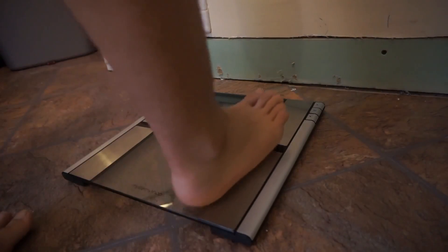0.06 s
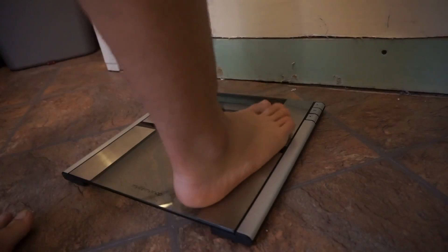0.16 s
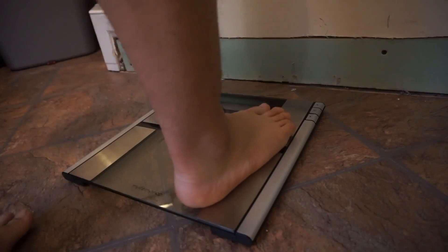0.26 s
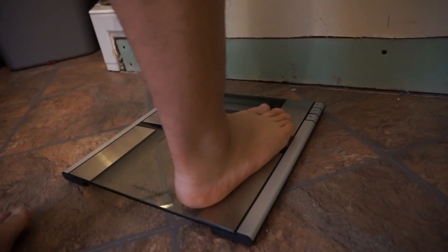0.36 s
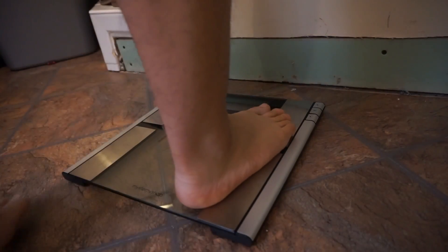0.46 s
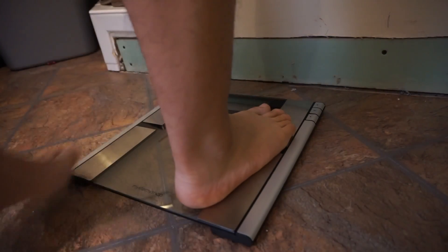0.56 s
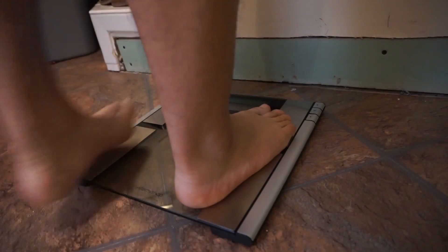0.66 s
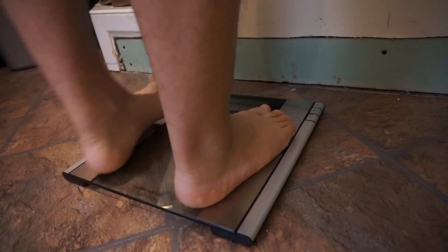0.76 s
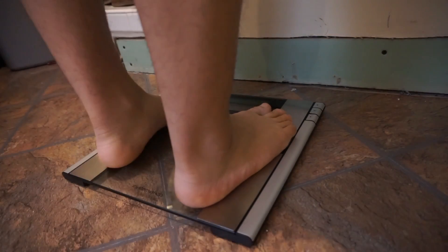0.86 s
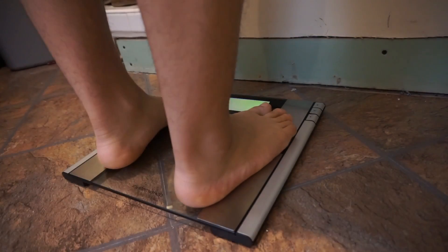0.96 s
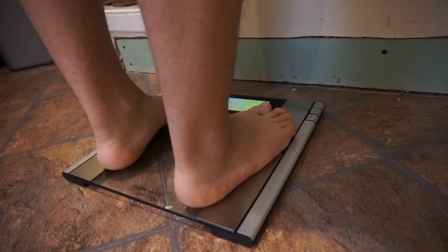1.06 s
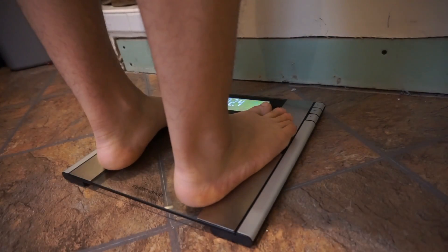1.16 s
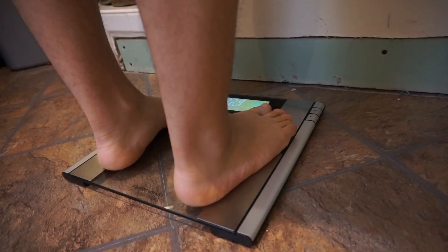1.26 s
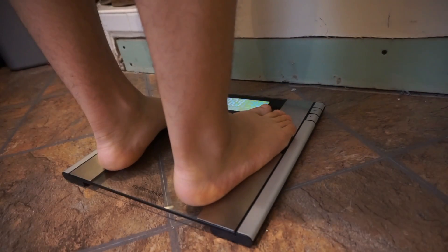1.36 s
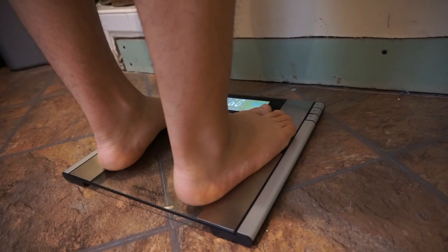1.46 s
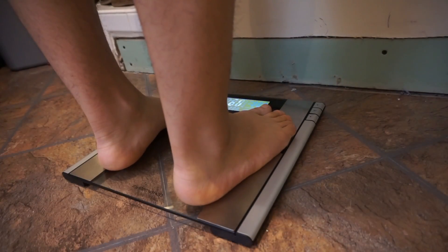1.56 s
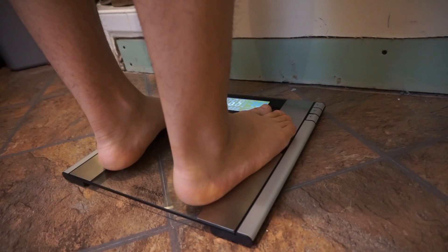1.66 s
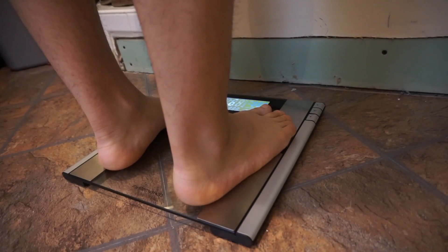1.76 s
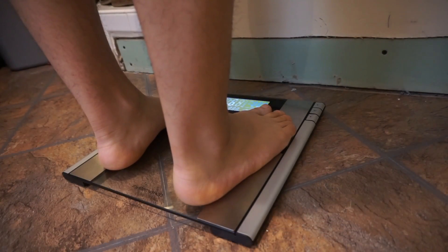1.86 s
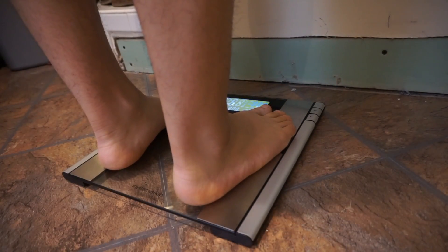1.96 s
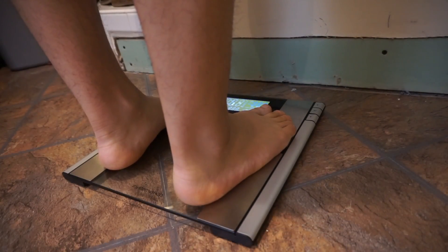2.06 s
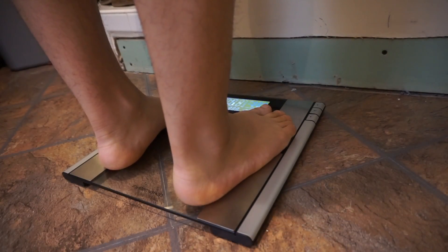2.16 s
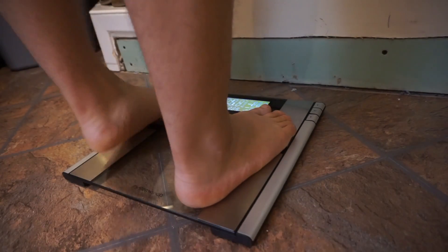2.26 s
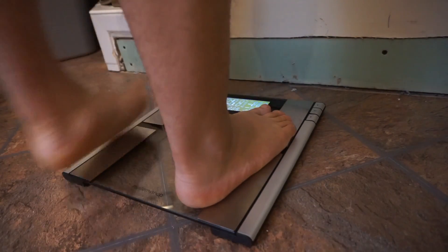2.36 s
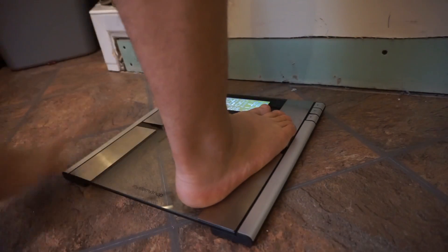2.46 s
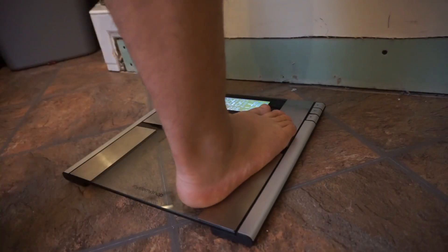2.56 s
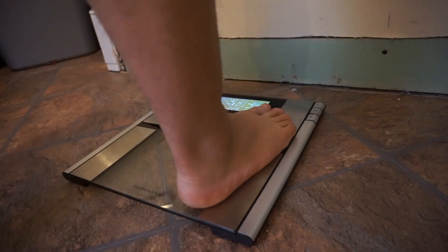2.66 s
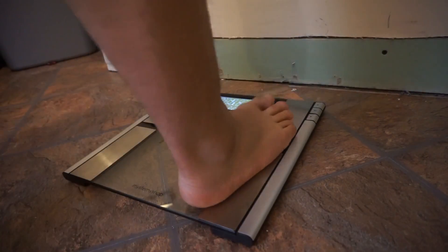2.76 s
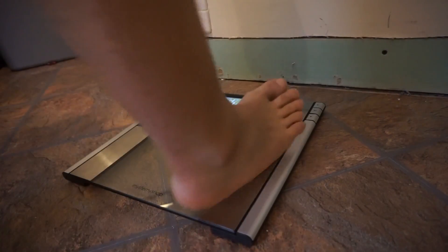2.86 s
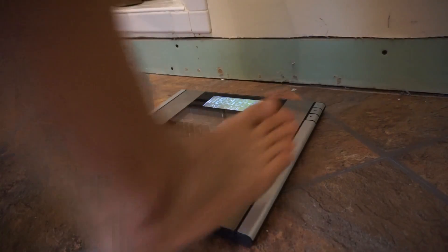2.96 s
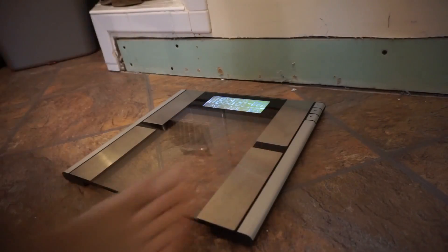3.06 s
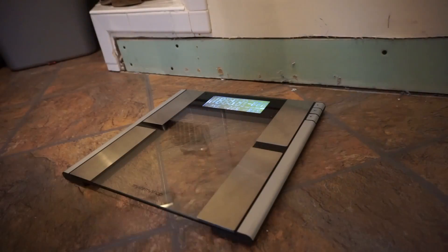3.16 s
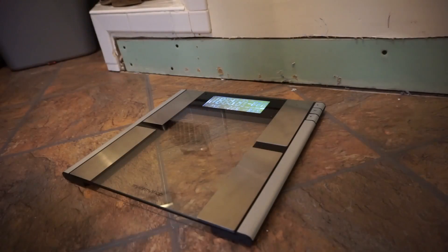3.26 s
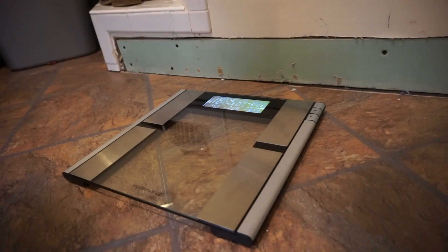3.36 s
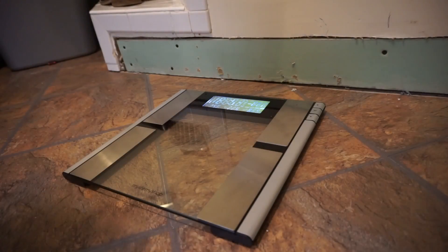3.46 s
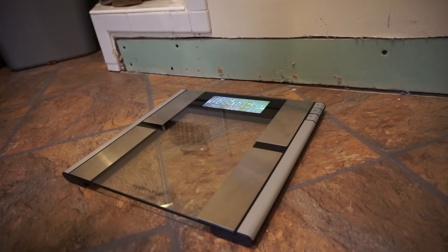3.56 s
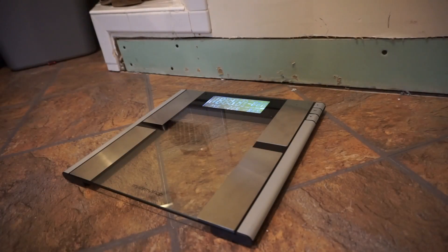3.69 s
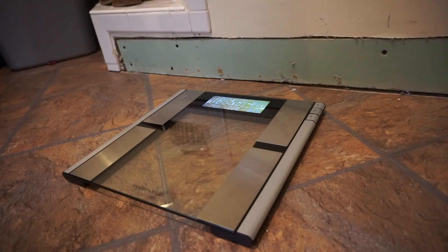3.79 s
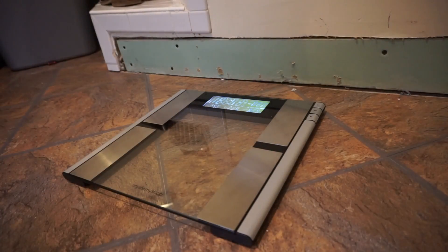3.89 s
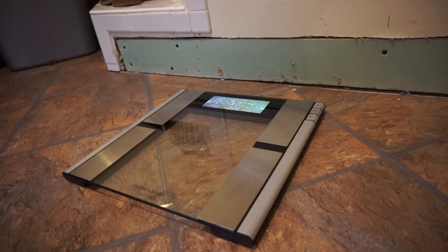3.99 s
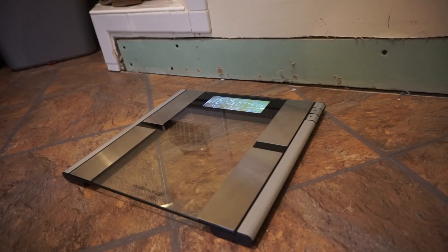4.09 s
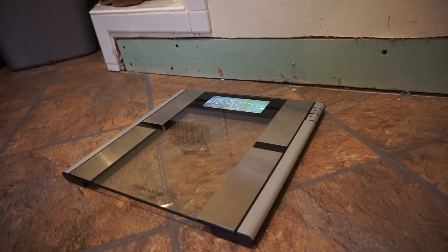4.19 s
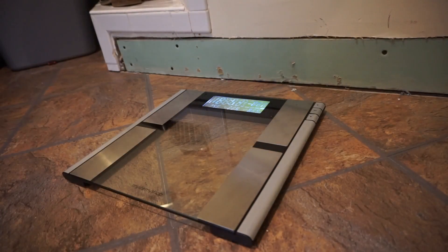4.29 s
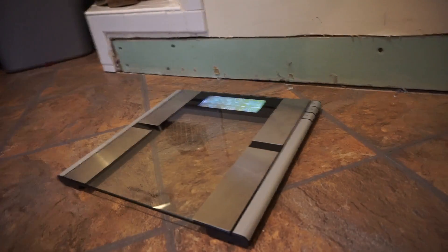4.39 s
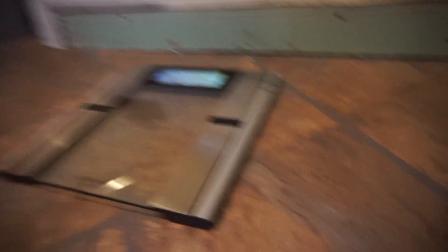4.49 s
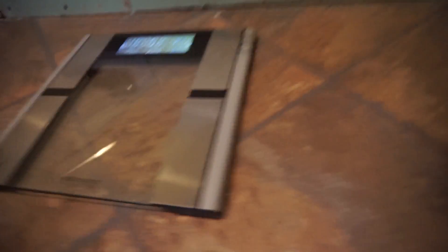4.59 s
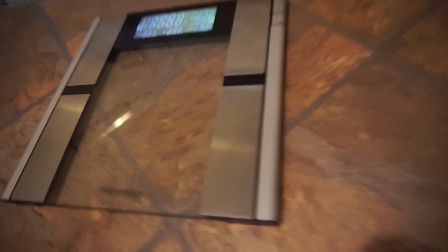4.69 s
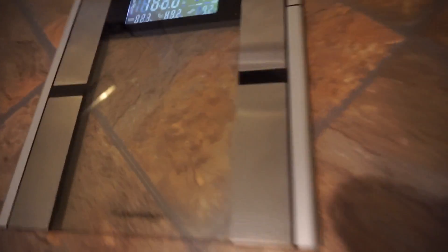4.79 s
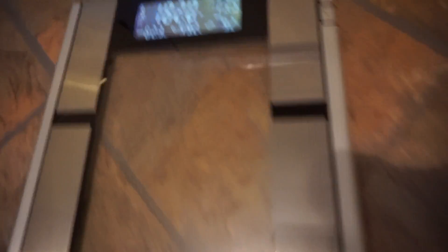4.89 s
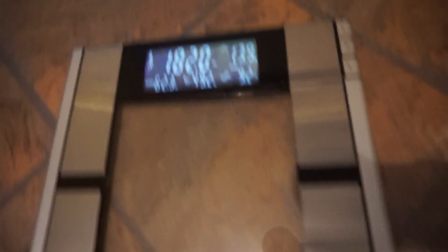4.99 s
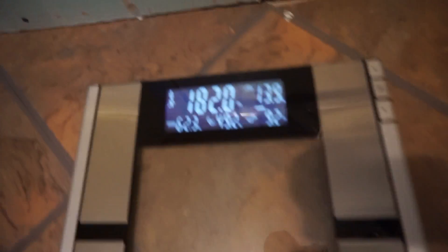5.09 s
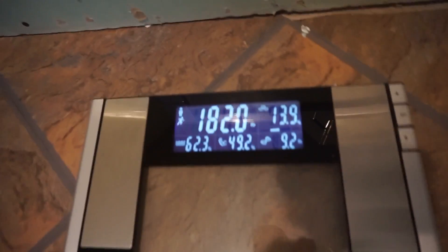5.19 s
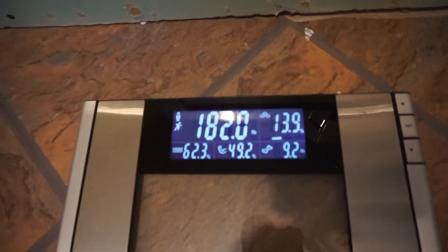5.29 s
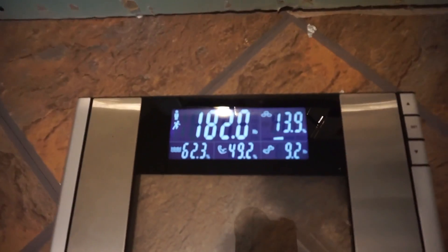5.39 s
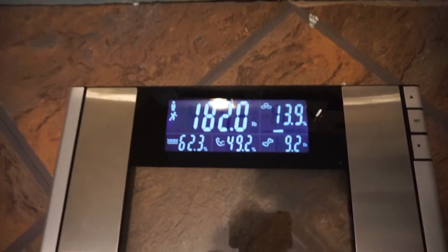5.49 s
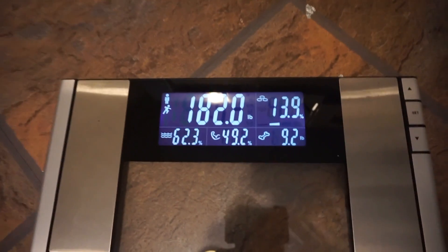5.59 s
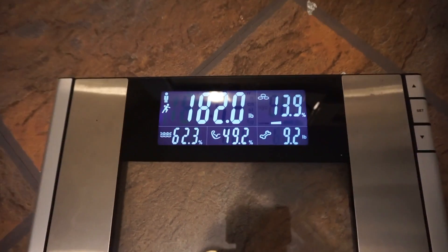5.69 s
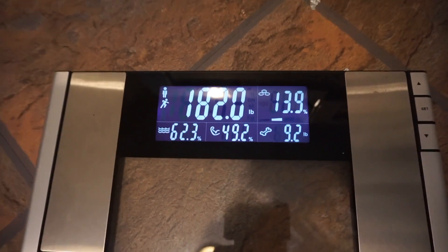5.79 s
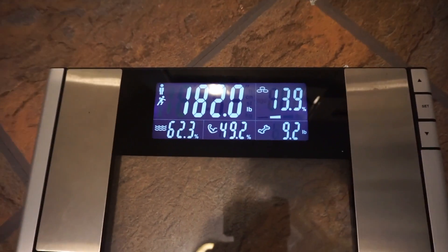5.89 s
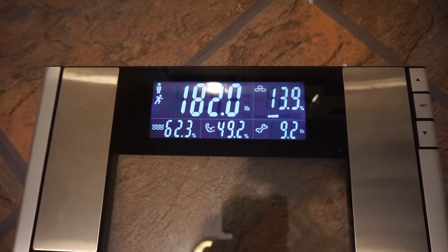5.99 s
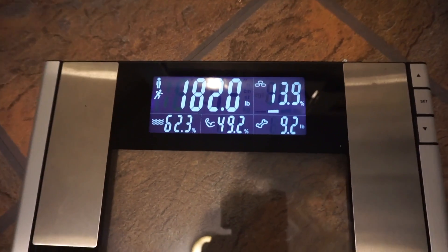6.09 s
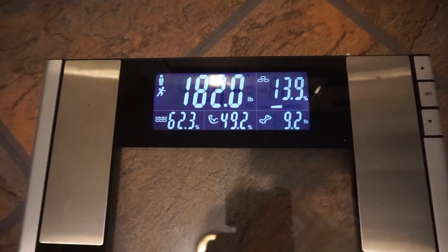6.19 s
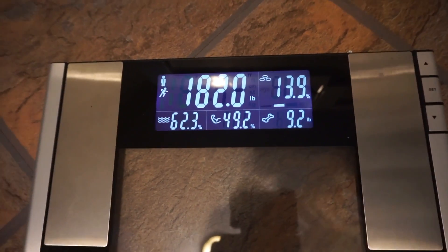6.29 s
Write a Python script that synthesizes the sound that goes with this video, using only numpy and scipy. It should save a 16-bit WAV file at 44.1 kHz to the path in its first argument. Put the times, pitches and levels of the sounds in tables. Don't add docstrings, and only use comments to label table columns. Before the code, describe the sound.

In a small tiled room, bare feet step onto a glass bathroom scale with sticky ticks and faint skin scuffs, pause, then step off with a sharp tap and peeling clicks. After a quiet gap, a hand grabs the camera: a dense burst of loud plastic knocks and snaps right at the microphones, a few smaller knocks, a brief creak, then hiss and faint handling.

```python
import sys
import numpy as np
from scipy import signal
from scipy.io import wavfile
from scipy.ndimage import uniform_filter1d

SR = 44100
rng = np.random.default_rng(int(sys.argv[2]) if len(sys.argv) > 2 else 0)


def gain_from_db(level_db):
    decades = np.asarray(level_db, float) / 20
    return 10 ** decades


def dump_mix(stems):
    frames = np.atleast_2d(stems).T
    limited = np.clip(frames, -1, 1)
    pcm = np.round(limited * 32767).astype(np.int16)
    wavfile.write(sys.argv[1], SR, pcm)


N = 279653

# (time [s], peak [dB], ring [Hz], t60 [s], left-right [dB])
DULL_TICKS = [(0.185, -38, 997.3, 0.022, -3), (0.207, -36.5, 1160, 0.03, -5),
              (0.224, -43, 1099, 0.02004, -5), (.263, -46, 1003, 0.0217, -2),
              (0.277, -52, 492, 0.02007, 0.5), (0.394, -29, 1300, 0.01998, -4),
              (0.538, -39, 1266, 0.01138, -3), (0.55, -59.5, 310.9, 0.041, -2),
              (0.919, -50, 1001, 0.01023, 4.5), (0.9402, -42, 770, 0.016, -0.5),
              (2.3692, -25, 1090, 0.011, -1), (2.816, -35.5, 1333, 0.041, 2.5),
              (2.846, -41, 1482, 0.019, -1.5), (2.9248, -33.5, 1080, 0.008, -6),
              (3.71, -55, 1121, 0.01293, -3), (5.572, -44.5, 1335, 0.025, -1.5),
              (5.592, -48, 1250, 0.00855, -20), (5.659, -45, 1430, 0.016, -5),
              (6.062, -40, 1292, 0.01291, -3)]
SHARP_TICKS = [(0.393, -23, 3090, 0.0202, -10), (0.3953, -23, 3000, 0.02544, -9.5),
               (0.4073, -31, 3063, 0.02036, -2), (.43, -41, 2994, 0.0197, -5.5),
               (0.436, -43, 3195, 0.0298, -5.5), (.45, -39, 2998, 0.02007, -3.5),
               (0.4174, -34, 2640, 0.0101, -6), (0.5385, -43, 2885, 0.0108, 9.5),
               (0.5571, -31, 2704, 0.0097, 1.5), (0.5742, -32, 4220, 0.01829, -10),
               (0.9187, -37, 2997, 0.00853, 3), (0.9408, -30.5, 3800, 0.013, -4),
               (0.955, -46, 3600, 0.00796, 1.5), (1.2256, -40, 4600, 0.01256, -4),
               (2.7029, -43.5, 2944, 0.01682, 8), (2.9241, -51, 2820, 0.01308, -8.5),
               (3.764, -44, 2088, 0.01367, 7), (3.8517, -42.5, 2070, 0.018, -1)]
SLAP_TICKS = [(0.1838, -26, 3850, 0.012, -7), (.196, -39.5, 3199, .006, -5.5), (0.209, -38, 2400, .006, -6),
              (0.225, -45, 2407, .005, -3), (.312, -43, 3007, 0.00511, 0.5),
              (0.394, -24.5, 4202, 0.00551, -11), (0.9186, -46, 4240, 0.00372, 2.5),
              (2.369, -44, 5160, 0.003025, -10), (2.3693, -18.5, 2800, 0.0067, 1.5),
              (.941, -36, 5822, 0.004, -3), (2.925, -34, 4300, 0.0043, -9)]
THIN_TICKS = [
    (0.405, -27, 10270, 0.0364, -15),
    (0.5375, -39, 11770, 0.01566, -2),
    (0.9403, -30.5, 12800, 0.0356, -10.5),
    (2.371, -23, 11680, 0.02, -10),
    (2.9243, -21, 12500, 0.0249, -23),
    (3.1807, -27.5, 11140, 0.0132, 0),
    (3.7111, -32.5, 8500, 0.01235, 1.5),
]
# (time [s], peak [dB], ring [Hz], t60 [s], left-right [dB])
PLATE_PINGS = [(0.9418, -39, 2720, 0.024, 2), (2.3695, -30.5, 1750, 0.015, 2),
               (2.3697, -45, 2100, 0.0136, -1), (3, -43, 870, 0.037, 0), (2.809, -44, 1770, .03, 0),
               (2.83, -45, 1400, .02, 0), (2.897, -39.5, 1050, .06, -2), (2.914, -47, 2950, .06, 0),
               (.399, -36, 3400, 0.085, -7), (.401, -41.5, 2450, 0.076, -4), (.272, -49, 470, 0.086, 0),
               (.196, -39, 3170, 0.022, -4), (2.8145, -44, 1700, .03, 0), (2.787, -43, 3100, .015, 0),
               (2.868, -42, 2600, .02, 0), (3.685, -56, 530, .06, -2)]
# (peak time [s], heel weight [dB], rise [s], fall [s], skin hiss re heel [dB])
PRESSES = [
    (0.2, -47.5, .015, 0.17, -6),
    (0.95, -52.5, 0.0115, 0.0753, -4),
    (1.22, -56, 0.027, 0.018, -1),
    (2.376, -42.5, 0.0055, 0.084, -0.5),
    (2.814, -54.5, 0.0072, 0.0944, -17),
    (3.08, -56, 0.034, 0.023, 0),
    (3.46, -65, 0.015, 0.18, 8),
    (3.68, -57, 0.0274, 0.0786, -6.5),
]
# (peak time [s], heel weight [dB], rise [s], fall [s], skin hiss re heel [dB])
SLIDES = [(0.385, -69, 0.5767, 0.0206, 10.833), (0.44, -59.5, 0.051, 0.449, 6.26),
          (0.33, -58.5, .04, 0.056, 10.36), (0.539, -52, 0.0055, 0.035, 11.22),
          (0.56, -55, 0.0155, 0.13, 6.798), (0.922, -58, 0.004, 0.12, 4.69),
          (1.05, -71.5, 0.15, 0.36, 10.095), (2.318, -55.5, 0.036, 0.1136, 11.3),
          (2.54, -66.5, 0.16, 0.11, 7.2), (2.702, -64, 0.031, 0.22, 10.7), (2.8, -72, 0.11, 0.095, 3),
          (2.86, -52, .12, .13, 0.4), (2.924, -47.5, .15, 0.06369, 8.6),
          (3.61, -66.5, 0.206, 0.0746, 8.315), (3.79, -62, 0.31, 0.32, 12.3), (3.96, -64, .1, 0.21, 13)]
# (centre [Hz], width [Hz], level [dB])
PLATE_MODES = [(488, 103, 0.5), (1075, 320, 2), (1448.3, 41, 7), (1750, 480, -6)]
# (frequency [Hz], t60 [s])
TILE_T60 = [(250, 0.32), (1000, 0.3523), (3000, 0.268), (8000, 0.59), (16000, 0.1746)]
# (time [s], peak [dB], case ring [Hz], upper ring re peak [dB], left-right [dB])
LOOSE_KNOCKS = [(4.4119, -29.5, 1500, -1, -5), (4.421, -31, 1210, -24.5, -13),
                (4.4298, -14.5, 1240, -5.5, 4), (4.433, -16.5, 1140, -4.5, -5), (4.4342, -16, 585, -12, -5),
                (4.4344, -22, 1205, 2, 12), (4.440, -12, 1438, -19, 2.5), (4.4433, -17, 920, -19.5, -8),
                (4.4454, -19.5, 613.1, -19.5, -7), (4.449, -17, 1401, -17, 9), (4.453, -17, 615.6, -3.5, 1),
                (4.4557, -20.5, 1200, -17, 8), (4.459, -18, 1260, -27.5, -6), (4.463, -20, 890, -16, -4),
                (4.497, -23, 1264, -7, -1), (4.497, -24, 1270, -21, -10), (4.5035, -27, 556, -17, -11),
                (4.512, -28, 1681, -7, 2), (4.52, -24.5, 1290, 3, 9), (4.5368, -17.5, 1189, -12.5, -12),
                (4.5381, -22, 1224, -15, -6.5), (4.542, -25, 564, -18.5, -20), (4.5533, -15, 590, -7, 1.5),
                (4.58, -16, 1330, -13.5, 9), (4.5825, -16, 597.8, -20.5, -10), (4.5875, -20, 815, -14, -1),
                (4.5928, -15, 640, -14.5, -1), (4.5952, -22.5, 1016, -16.5, -11.5)]
# (time [s], peak [dB], case ring [Hz], upper ring re peak [dB], left-right [dB])
HELD_KNOCKS = [
    (4.739, -33.5, 526, -24.5, -6.5),
    (4.805, -38, 825, -23.5, 8),
    (4.9153, -23, 540.5, -14, 2),
    (4.918, -28.5, 920, -10, -3.5),
    (4.9235, -27, 606, -24.5, -7),
    (4.929, -38, 601.9, -5, 1),
    (4.988, -35, 1804, -10, -0.5),
    (4.9891, -42, 808, 4, 8),
]
# (time [s], peak [dB], centre [Hz], t60 [s], left-right [dB])
SNAPS = [(4.412, -28.5, 5626, 0.00893, -7.5), (4.4287, -28, 7000, 0.02753, 1.5),
         (4.433, -25, 5197, 0.01767, 2), (4.4365, -30.5, 8000, 0.0198, -1),
         (4.4475, -24, 12500, 0.01243, 4.5), (4.5201, -12.5, 11950, 0.0078, 0),
         (4.915, -37.5, 7166, 0.0095, 1), (4.441, -27, 4365, 0.0283, 5.5), (4.4472, -15, 6595, 0.0095, -3),
         (4.4517, -21, 4270, 0.011, -8), (4.4678, -10, 8000, 0.011, -2), (4.47, -20, 7450, 0.014, -6),
         (4.513, -29, 5910, 0.03947, -8), (4.5206, -10.5, 6000, 0.0084, -1), (4.5357, -22, 5994, 0.012, -4),
         (4.5524, -34, 8590, 0.033, 3), (4.556, -28, 8770, 0.02003, 6), (4.563, -36, 7000, .012, -4),
         (4.5599, -28, 4030, 0.01863, -0.5), (4.5935, -31, 4130, 0.01712, 4.5),
         (4.6194, -34, 4613, 0.063, 1.5), (4.671, -34, 8000, 0.0123, -3), (4.6962, -34, 7300, 0.00903, 2),
         (4.8705, -39.5, 4431, 0.01204, -7), (4.9875, -31, 5994, 0.00654, -1)]
# (time [s], peak [dB], ring [Hz], t60 [s], left-right [dB])
CASE_PINGS = [(4.4215, -30, 1250, 0.034, -6), (4.4425, -14.5, 1330, 0.022, -4),
              (4.4445, -20, 600, 0.018, -1), (4.4968, -19.5, 1270, 0.024, -6),
              (4.5035, -31, 1300, .015, -4), (4.538, -18.5, 1267, 0.024, -5),
              (4.5425, -17.5, 580, 0.02, -6), (4.5945, -24, 1500, .01, -3), (4.4535, -29, 3300, .012, -3),
              (4.473, -37, 2570, 0.024, -3), (4.5235, -21.5, 4480, 0.012, 0), (4.581, -31, 3100, .02, 0),
              (4.625, -47, 1754, .12, 0), (4.742, -49.5, 1260, .25, -2), (4.9165, -19, 1150, 0.0084, 0),
              (4.924, -28, 1190, .012, -2), (4.9166, -29, 3000, 0.012, 7), (4.9895, -30.5, 3250, 0.019, 7),
              (4.989, -36, 1950, 0.019, 1)]
# (centre [Hz], width [Hz], level [dB])
CASE_MODES = [(352, 64, 1), (660, 270, -1.5), (1210, 207.9, -1), (1890, 180, -4.5)]
# (peak time [s], rub [dB], rise [s], fall [s], brightness re rub [dB])
GRABS = [
    (4.441, -48, 0.031, 0.041, 17.5),
    (4.518, -40, 0.01547, 0.1, 9.5),
    (4.602, -42.5, .03, .17, 4),
    (4.935, -51, .03, 0.013, -0.5),
    (6.28, -62.5, 0.092, 0.41, -19),
]
# (peak time [s], rub [dB], rise [s], fall [s], brightness re rub [dB])
SHIFTS = [
    (4.68, -54, 0.098, 1, 4),
    (4.992, -56.5, 0.0044, 0.038, 13.5),
    (5.1, -56.5, 0.0503, 0.20125, -1),
    (5.2, -68, 0.092, 0.834, -15),
    (5.7, -62, 0.025, 0.0215, -5),
    (6.202, -63, 0.02761, 0.0287, -12),
]
# (time [s], level [dB])
CREAK = [(4.994, -52.5), (5.0, -47), (5.098, -52), (5.15, -77)]
# (centre [Hz], width [Hz], level [dB])
CREAK_RINGS = [(355, 45, -13), (577, 50, -10), (700, 30, -7), (1190, 130, -12), (1560, 130, -6),
               (1870, 90, -10), (3030, 300, -10), (3850, 120, -12), (4380, 160, -11)]
# (peak time [s], rumble [dB], rise [s], fall [s], boards re rumble [dB])
SHAKES = [(0.23, -96.5, 0.222, 0.256, 6), (0.44, -96, .2, 0.4055, -2.5), (0.58, -87.5, 0.3005, 0.0808, 10),
          (0.94, -85.5, 0.0793, 0.1202, -8), (1.34, -83, 0.0778, 0.23, 4.5), (1.45, -90, 0.137, 0.1054, 21),
          (2.3, -87, 0.0998, 0.1414, 10), (2.44, -90, 0.1149, 0.1006, 5.5), (2.78, -97, 0.12, 0.89, 0),
          (3.0, -88.5, 0.37, 0.063, 4), (3.9, -89.5, 0.47, 0.33, 4.5), (4.45, -72, 0.032, 0.122, 28),
          (4.6, -92, 0.355, 0.9, 17), (4.73, -81, 0.27, 0.22, 22), (4.92, -87, 0.032, 0.1117, 34),
          (5.03, -95, .2, 0.95, 3), (5.86, -100, 0.24, 0.81, -5.5), (6.32, -73, 0.05, 0.31, 10)]
# (frequency [Hz], level per Hz [dB])
AIR_SPECTRUM = [(71, -62.5), (120, -27), (209, -21.5), (350, -11.5), (458, -11), (624, -6), (782, -7),
                (1160, -0.5), (1390, -0.5), (1980, -7.5), (2750, -5.5), (4790, -9.5), (12900, -12.5),
                (15500, -15), (16500, -49.5)]
# (frequency [Hz], left-right likeness [-1..1])
AIR_LIKENESS = [(60, 0.218), (180, 0.49), (550, -0.17), (1650, -0.087), (4970, -0.061), (15000, 0.26)]


def ticks():
    out = np.zeros((2, N))
    colours = [(0.42, DULL_TICKS), (0.49, SHARP_TICKS), (0.75, SLAP_TICKS), (0.9, THIN_TICKS)]
    for width_share, rows in colours:
        for s, peak_db, ring_hz, t60_s, pan_db in rows:
            blow = burst(t60_s, same=0.77, spike=9)
            ring = above(steep(blow, ring_hz, width_share * ring_hz), 258)
            add(out, s, peaked(ring, peak_db), np.clip(pan_db, -8, 8))
    return out


def pings(rows):
    out = np.zeros((2, N))
    t = np.arange(6000) / SR
    for s, peak_db, ring_hz, t60_s, pan_db in rows:
        decay = gain_from_db(peak_db - 60 * t / max(t60_s, 0.003))
        add(out, s, decay * np.sin(2 * np.pi * ring_hz * t) * np.ones((2, 1)), pan_db)
    return above(above(out, 260), 200)


def scuffs():
    out = np.zeros((2, N))
    for plate_ring_db, rows in [(-3, PRESSES), (6.5, SLIDES)]:
        for *shape, hiss_db in rows:
            s, level_db = swell(*shape)
            rub = grainy(len(level_db), same=0.29, per_s=500, spread_db=-1)
            heel = evened(above(body(rub, PLATE_MODES), 280))
            plate = evened(steep(rub, 2970, 2360))
            hiss = evened(above(rub, 4900))
            add(out, s, gain_from_db(level_db) * (heel + gain_from_db(plate_ring_db) * plate + gain_from_db(hiss_db) * hiss))
    return out


def room(x):
    taps = np.zeros((2, SR // 2))
    at = np.arange(160, SR // 2 - 20, 20) + rng.integers(0, 20, (2, (SR // 2 - 161) // 20))
    np.put_along_axis(taps, at, rng.choice([-1., 1.], at.shape), 1)
    hz, t, z = signal.stft(taps, SR, nperseg=256)
    decay = gain_from_db(-60 * t / read(TILE_T60, hz)[:, None])
    tail = signal.istft(z * decay, SR, nperseg=256)[1]
    tail = tail / np.linalg.norm(tail[0])
    return signal.fftconvolve(x.mean(0)[None], tail, axes=1)[:, :N]


def knocks():
    out = np.zeros((2, N))
    for chatter_t60_s, rows in [(0.013, LOOSE_KNOCKS), (0.006, HELD_KNOCKS)]:
        for s, peak_db, ring_hz, upper_db, pan_db in rows:
            blow = burst(chatter_t60_s, same=0.6, spike=12)
            ring = steep(blow, ring_hz, 0.63 * ring_hz)
            shell = gain_from_db(-7) * body(blow, CASE_MODES)
            thump_gain = gain_from_db(-2.5) * min(600 / ring_hz, 1) ** 1.7
            low = above(ring + shell + thump_gain * steep(blow, 445, 240), 168.4)
            low = above(below(low, 5000), 150)
            upper = steep(burst(chatter_t60_s, same=0.01933, spike=1.2), 2790, 991.7)
            knock = peaked(low, peak_db) + peaked(upper, peak_db + upper_db + 3.5)
            add(out, s, knock, np.clip(pan_db, -8, 8))
    return out


def snaps():
    out = np.zeros((2, N))
    for s, peak_db, centre_hz, t60_s, pan_db in SNAPS:
        blow = above(burst(t60_s, same=-0.072, spike=0), 2400)
        snap = resonate(blow, centre_hz, 0.33 * centre_hz) + 0.15 * blow
        add(out, s, peaked(snap, peak_db), pan_db)
    return out


def hand():
    out = np.zeros((2, N))
    for thump_db, rows in [(-2.5, GRABS), (-18.5, SHIFTS)]:
        for *shape, bright_db in rows:
            s, level_db = swell(*shape)
            rub = grainy(len(level_db), same=0.04, per_s=860, spread_db=-0.5)
            shell = evened(above(body(rub, CASE_MODES), 400))
            bright = evened(steep(rub, 1900, 3700))
            thump = evened(above(steep(rub[0] + 0.13 * rub, 283, 324), 76))
            add(out, s, gain_from_db(level_db) * (shell + gain_from_db(bright_db) * bright + gain_from_db(thump_db) * thump))
    return out


def creak():
    out = np.zeros((2, N))
    time_s, points_db = np.transpose(CREAK)
    t = np.arange(time_s[0], time_s[-1], 1 / SR)
    level_db = np.interp(t, time_s, points_db)
    soft_ends = np.clip(np.minimum(t - time_s[0], time_s[-1] - t) / 0.003, 0, 1)
    rub = grainy(len(t), same=0.32, per_s=530, spread_db=2.5)
    rings = evened(sum(gain_from_db(db) * steep(rub, hz, width) / np.sqrt(width) for hz, width, db in CREAK_RINGS))
    sag = 0.09
    slowing = np.cumsum(np.linspace(1 + sag / 2, 1 - sag / 2, len(t)))
    sinking = np.array([np.interp(slowing, np.arange(len(t)), side) for side in rings])
    add(out, time_s[0], soft_ends * gain_from_db(level_db) * sinking)
    return out


def rumble():
    deep_band = signal.butter(2, [25, 100], "band", fs=SR, output="sos")
    deep = signal.sosfilt(deep_band, pair(N, 0.19))
    boards = above(steep(pair(N, 0.65), 163, 153), 94)
    still_db, still_boards_db = -104, 7.5
    shake = np.ones((2, N)) * gain_from_db([[still_db], [still_db + still_boards_db]])
    for *shape, boards_db in SHAKES:
        s, level_db = swell(*shape)
        add(shake, s, gain_from_db([level_db, level_db + boards_db]))
    return shake[0] * evened(deep) + shake[1] * gain_from_db(-8.5) * evened(boards)


def whine():
    return gain_from_db(-93) * evened(steep(pair(N, 0.5), 12800, 150))


def air():
    frames, hz = N // 256 + 5, np.fft.rfftfreq(1024, 1 / SR)
    a, b, c, d, patches = rng.standard_normal((frames, 513, 5)).T
    patches = evened(uniform_filter1d(uniform_filter1d(patches, 12, 0), 14, 1))
    same = np.clip(read(AIR_LIKENESS, hz), -1, 1)[:, None]
    left = a + 1j * b
    right = same * left + np.sqrt(1 - same ** 2) * (c + 1j * d)
    z = np.array([left, right]) * gain_from_db(read(AIR_SPECTRUM, hz)[:, None] + 0.13 * patches)
    return gain_from_db(-54.5) * evened(signal.istft(z, nperseg=1024, noverlap=768)[1][:, :N])


def swell(s, peak_db, rise_s, fall_s):
    rise_s, fall_s = np.clip([rise_s, fall_s], 0.003, 1.5)
    t = np.arange(max(s - 2 * rise_s, 0), min(s + 2 * fall_s, N / SR), 1 / SR)
    return t[0], peak_db - 20 * np.maximum((s - t) / rise_s, (t - s) / fall_s)


def burst(t60_s, same, spike):
    chatter = pair(2000, same) * gain_from_db(-60 * np.arange(2000) / SR / max(t60_s, 0.002))
    blow = spike * signal.unit_impulse(2000, 2)
    return np.pad(chatter + blow, ((0, 0), (SR // 1200, 0)))


def grainy(size, same, per_s, spread_db):
    slip_gain = gain_from_db(spread_db * np.minimum(rng.exponential(1, size), 4))
    slips = (rng.random(size) < per_s / SR) * slip_gain
    return pair(size, same) * (1 + signal.lfilter([1], [1, -0.97], slips))


def pair(size, same):
    a, b = rng.standard_normal((2, size))
    same = np.clip(same, -1, 1)
    return np.array([a, same * a + np.sqrt(1 - same ** 2) * b])


def body(x, modes):
    return sum((-1) ** k * gain_from_db(db) * resonate(x, hz, width) for k, (hz, width, db) in enumerate(modes))


def resonate(x, hz, width):
    return signal.lfilter(*signal.iirpeak(min(hz, SR / 2.2), max(hz / width, 0.3), SR), x)


def steep(x, hz, width):
    return resonate(resonate(x, hz, width), hz, width)


def above(x, hz):
    return signal.sosfilt(signal.butter(3, hz, "high", fs=SR, output="sos"), x)


def below(x, hz):
    return signal.sosfilt(signal.butter(8, hz, fs=SR, output="sos"), x)


def evened(x):
    return x / np.sqrt(np.mean(x ** 2) + 1e-20)


def peaked(x, db):
    return gain_from_db(db) * x / np.sqrt((x ** 2).mean(0).max())


def read(points, hz):
    f, value = np.transpose(points)
    return np.interp(np.log(hz + 1), np.log(f + 1), value)


def add(mix, s, sound, pan_db=0):
    part = mix[:, round(s * SR):][:, :sound.shape[1]]
    part += sound[:, :part.shape[1]] * gain_from_db([[pan_db / 2], [-pan_db / 2]])


def scene():
    tick = ticks() + pings(PLATE_PINGS)
    scuff = scuffs()
    case = knocks() + snaps() + pings(CASE_PINGS)
    glass = tick + gain_from_db(-1) * steep(tick, 3100, 830)
    wet = room(gain_from_db(-3.5) * glass + gain_from_db(-5.5) * scuff + gain_from_db(-13) * resonate(case, 1250, 2700))
    feet = below(tick, 14200) + below(scuff + wet, 15500)
    grip = below(case, 15600) + hand() + creak()
    return feet + grip + rumble() + whine() + air()


def roll_off(x):
    return signal.sosfilt(signal.butter(12, 16700, fs=SR, output="sos"), x)


def record(dry):
    edge_hz = 16300
    mix = below(below(above(dry, 20), edge_hz), edge_hz)
    return roll_off(mix)


dry = scene()
out = record(dry)
dump_mix(out)
```